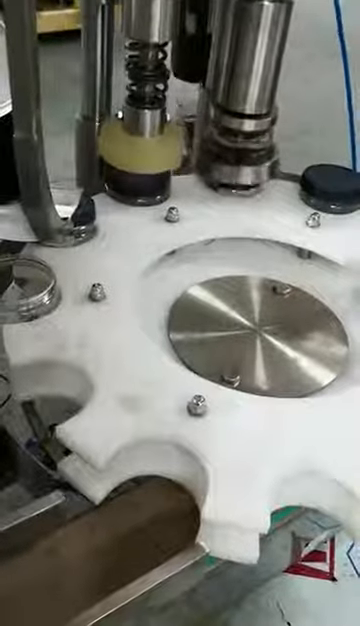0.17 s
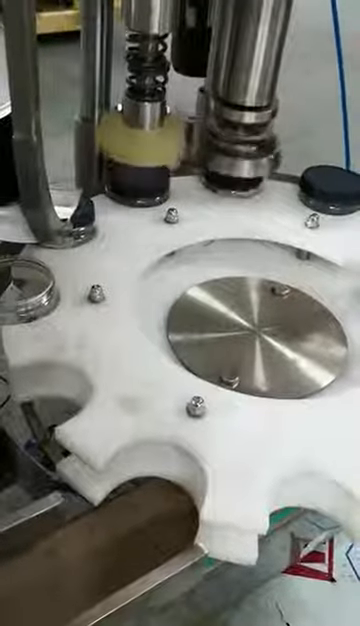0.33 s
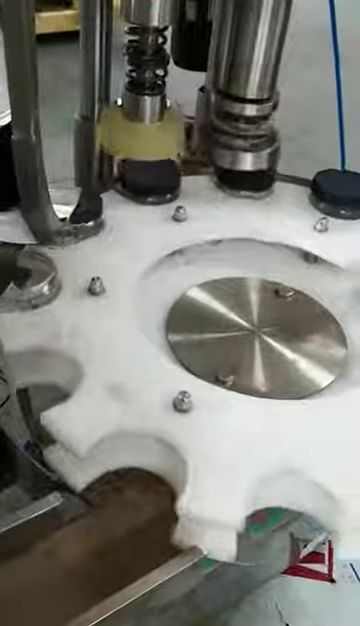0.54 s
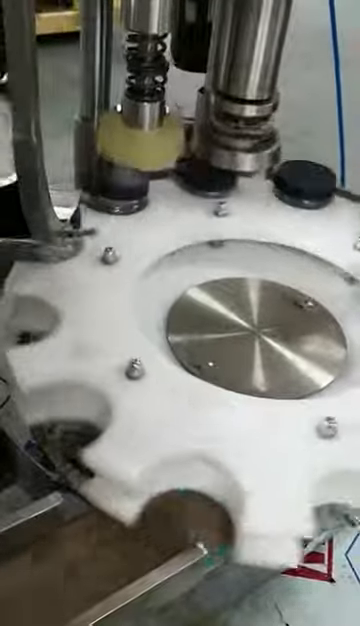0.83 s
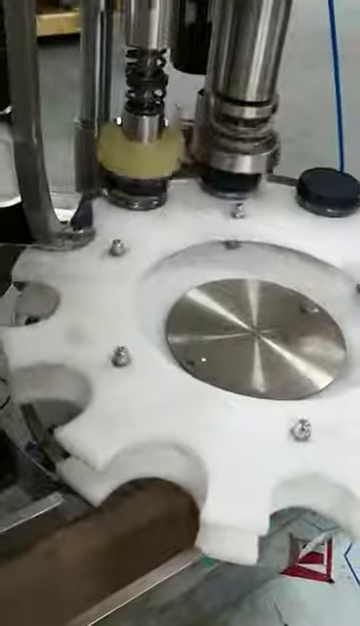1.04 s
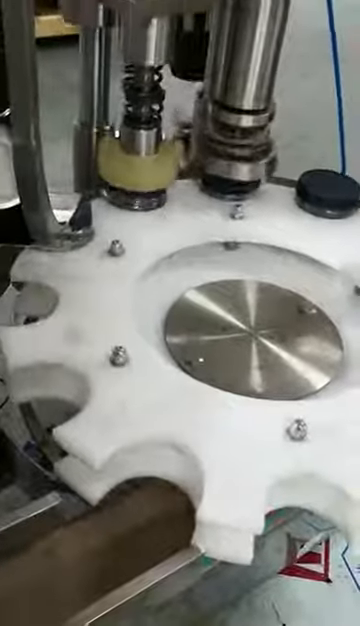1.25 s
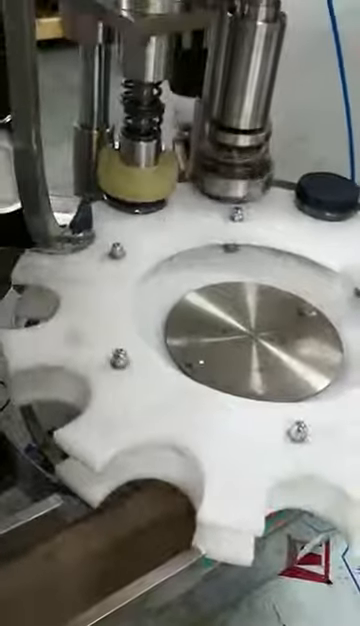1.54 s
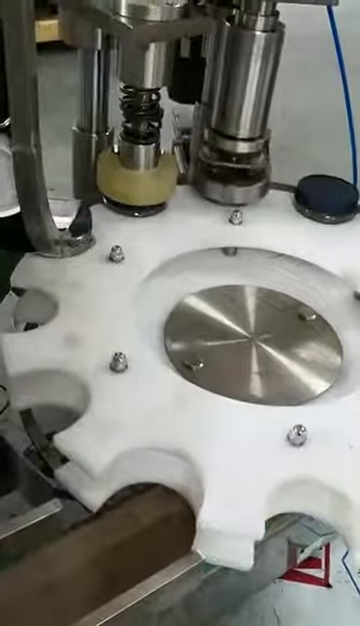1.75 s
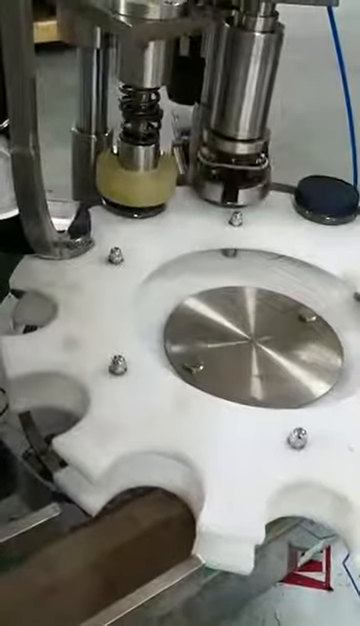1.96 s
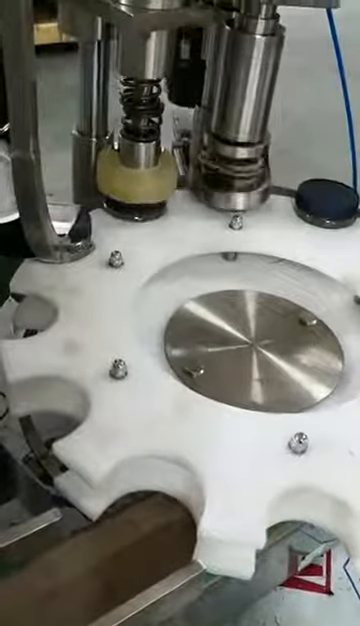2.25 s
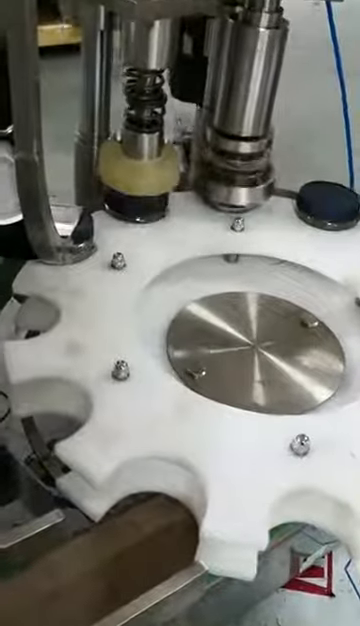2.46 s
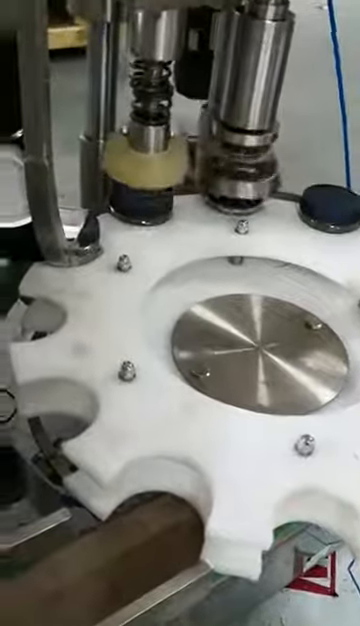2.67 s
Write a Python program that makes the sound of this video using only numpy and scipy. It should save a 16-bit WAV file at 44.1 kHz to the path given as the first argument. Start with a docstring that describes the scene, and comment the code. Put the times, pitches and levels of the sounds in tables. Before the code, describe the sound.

Close up in a workshop, a capping machine hums, rattles and hisses. A wheel drags clinking jars along, the heads land with taps and one sharp metal clack, a cap spins tight, and the heads lift with thumps.

```python
"""One cycle of a bottle capping machine, close by in a workshop. Motor rumble, drive hum, rattle and an
air leak run throughout. The frame thumps and a cap clinks; at 0.7 s the star wheel drags the jars on,
with clinks, squeaks and hissing valves. From 1.2 s the heads come down with thumps and taps, then one
hard clack and a puff of air. From 1.8 s the chuck spins a cap tight with a whirr and small squeaks;
after 2.2 s the heads lift, valves hiss and the frame thumps again."""
import sys
import numpy as np
from scipy import signal
from scipy.fft import rfft, irfft, next_fast_len
from scipy.io import wavfile
from scipy.ndimage import uniform_filter1d

SR = 44100
rng = np.random.default_rng(int(sys.argv[2]) if len(sys.argv) > 2 else 0)


def master_out(mix):
    """Clip the mix to full scale and print it as 16-bit PCM to the path in sys.argv[1]."""
    frames = np.transpose(np.atleast_2d(mix))
    ceiling = np.clip(frames, -1, 1)
    pcm = np.round(ceiling * 32767).astype(np.int16)
    wavfile.write(sys.argv[1], SR, pcm)


N = 123921
T = np.arange(N) / SR
EDGE_HZ, TOP_HZ = 7560, 8600  # upper band limits


def amp(db):
    """Amplitude ratio of a level in decibels."""
    return 10 ** (np.asarray(db) / 20)

def unit(x):
    """Normalisation to rms 1."""
    return x / np.sqrt(np.mean(x ** 2) + 1e-20)

def read(points, hz):
    """Interpolation on a logarithmic frequency axis."""
    f, value = np.transpose(points)
    return np.interp(np.log(hz + 1), np.log(f), value)

def contour(points, outside=None):
    """Linear interpolation in time."""
    return np.interp(T, *np.transpose(points), left=outside, right=outside)

def pan(db):
    """Constant-power panning: a positive level difference favours the left."""
    gains = amp(np.array([np.atleast_1d(db), -np.atleast_1d(db)]) / 2)
    return gains / np.sqrt((gains ** 2).mean(0))

def colour(x, spectrum, tilt_db=0):
    """Minimum-phase filtering at unit power, with a tilt per octave."""
    hz = abs(np.fft.fftfreq(4096, 1 / SR))
    tilt = tilt_db * np.log2(np.maximum(hz, 500) / 1000)
    rolloff = 60 * np.clip(hz / EDGE_HZ - 1, 0, 1)
    log_gain = np.log(unit(amp(read(spectrum, hz) + tilt - rolloff)))
    impulse = np.fft.ifft(np.exp(np.conj(signal.hilbert(log_gain)))).real[:2048]
    return signal.oaconvolve(x, impulse[None], axes=1)[:, :N]

def noise(correlation=0.):
    """Partially coherent white noise in two channels."""
    white = rng.standard_normal((3, N))
    return np.sqrt(correlation) * white[2] + np.sqrt(1 - correlation) * white[:2]

def drift(hz):
    """Low-pass random fluctuation of rms 1."""
    size = next_fast_len(N)
    spectrum = rfft(rng.standard_normal(size)) / (1 + (np.fft.rfftfreq(size, 1 / SR) / hz) ** 4)
    return unit(irfft(spectrum, size)[:N])

def sine(hz):
    """Frequency modulation: phase is the integral of frequency."""
    return np.sin(2 * np.pi * np.cumsum(hz) / SR)

def band(hz, width_hz):
    """A randomly driven resonance: narrow-band noise, independent in each channel."""
    phase = 2 * np.pi * hz * T
    return np.array([unit(drift(width_hz / 2) * np.cos(phase) + drift(width_hz / 2) * np.sin(phase))
                     for _ in range(2)])

def grains(per_s, spread_db):
    """Shot noise: tiny random impacts of uneven size."""
    impacts = (rng.random((2, N)) < per_s / SR) * rng.choice([-1, 1], (2, N))
    return unit(impacts * amp(spread_db * np.minimum(rng.exponential(1, (2, N)), 3)))

def ring(s, modes, scatter=0.):
    """Free decay of modes struck at time s, their phases scattered by up to `scatter` cycles."""
    t = T[T >= s][:SR] - s
    tone = sum(amp(db - 60 * t / t60) * np.sin(2 * np.pi * (hz * t + scatter * rng.random()))
               for hz, db, t60 in modes)
    return np.pad(tone, (np.sum(T < s), N))[:N]

def swells(rows):
    """Incoherent addition: the stereo envelopes of bursts sum in power."""
    power = sum((amp(db) * pan(pan_db)) ** 2 * np.exp(-((T - s) / np.where(T < s, rise, fall)) ** 2)
                for s, rise, fall, db, pan_db in rows)
    return np.sqrt(power)

def flutter(x, depth_db=2.2):
    """Random amplitude modulation, band by band."""
    bands = signal.stft(x, nperseg=512)[2]
    field = uniform_filter1d(rng.standard_normal(bands.shape[1:]), size=6, axis=0)
    field = unit(uniform_filter1d(field, size=8, axis=1))
    return signal.istft(bands * amp(depth_db * field), nperseg=512)[1][:, :N]

def from_left(x, delay_s=.00059):
    """Path difference: sound from the left arrives later on the right."""
    hz = np.fft.rfftfreq(N, 1 / SR)
    return np.array([x[0], irfft(rfft(x[1]) * np.exp(-2j * np.pi * hz * delay_s), N)])


# Motor rumble spectrum: f/Hz, level/dB
RUMBLE_SPECTRUM = [(20,-10.5),(45,-7.5),(90,-3),(150,-2),(200,2),(250,-1.5),(330,-2),(420,-7),(520,-30.5),(1000,-28.5)]
# Rumble envelope: t/s, level/dB
RUMBLE_LEVEL = [(0,0),(.78,-2),(.85,-8.5),(1.05,-2),(1.25,-1),(1.5,0),(1.62,-1.5),(1.9,-0.5),(2.32,1.5),(2.45,-2),(2.81,-2)]
def motor_rumble():
    """Random vibration of the motor radiates low noise, almost coherent between the channels."""
    gain = amp(-38 + contour(RUMBLE_LEVEL) + drift(18))
    return gain * pan(-0.5) * colour(noise(0.99), RUMBLE_SPECTRUM)

# Course of the drive's tone: t/s, f/Hz, level/dB
HUM_COURSE = [(0,202.7,-46),(0.251,203,-38),(0.499,187.5,-47.5),(0.761,189.1,-39.5),(.86,195,-70),(1.3,204,-37.5),(1.599,200,-51.5),(1.769,185,-36),(1.88,203.3,-46),(2.151,202.8,-33),(2.359,199.4,-48.5),(2.551,201.4,-36.5),(2.68,186.5,-51),(2.81,186,-36.5)]
def drive_hum():
    """Periodic vibration of the drive gives one tone, wavering in amplitude and frequency."""
    s, hz, db = np.transpose(HUM_COURSE)
    gain = amp(np.interp(T, s, db) + 3 * drift(41))
    return gain * np.sqrt(2) * sine(np.interp(T, s, hz) + 5 * drift(17))

# Rattle spectrum: f/Hz, level/dB
RATTLE_SPECTRUM = [(150,-29.5),(400,0.5),(540,-6.5),(720,-2),(1000,-3),(1500,-2.5),(2250,1),(2800,-2),(3300,-6.5),(3750,-7.5),(4300,-12),(5300,-6.5),(6300,-13),(7500,-16.5)]
# Activity of the mechanism: t/s, level/dB
RATTLE_LEVEL = [(0,3),(.1,0),(.25,-0.5),(.42,1),(.5,4.5),(.58,3.5),(.66,0),(.92,4),(1.1,1),(1.35,3),(1.55,3),(1.78,3.5),(2.12,3),(2.34,0.5),(2.44,2),(2.8,-1.5)]
def rattle():
    """Many small impacts in the mechanism superpose into broadband noise."""
    gain = amp(-35.5 + contour(RATTLE_LEVEL) + 0.21 * drift(13))
    impacts = 0.93 * noise(0.2) + 0.55 * grains(220, 1.64)
    return from_left(flutter(gain * colour(impacts, RATTLE_SPECTRUM)))

# Leak spectrum: f/Hz, level/dB
LEAK_SPECTRUM = [(2500,-35),(4200,-9),(4900,-12),(5300,-5.5),(5900,0.5),(6500,-6),(7100,1.5),(7400,4.5),(7600,-6)]
def air_leak():
    """A turbulent jet from the air line hisses steadily on the right."""
    gain = amp(-36.5 + 0.28 * drift(33))
    return flutter(gain * pan(-39.5) * colour(noise(), LEAK_SPECTRUM))

# Starts and stops of strokes: t/s, level/dB, duration/s, relative shudder/dB
THUMPS = [(0.076,-21.5,0.13,-12),(1.2218,-18.5,0.02,-4),(1.256,-27.5,0.026,-12.5),(1.292,-32,0.014,-10),(1.395,-32.5,0.033,-1.5),(2.2142,-15.5,0.027,-22.5),(2.252,-24,0.063,-12),(2.443,-21.5,0.115,-6.5)]
# Upper frame modes: f/Hz, level/dB, T60/s
FRAME_MODES = [(291.7,-6,0.16),(371.6,-16,0.27)]
# Shudder spectrum: f/Hz, level/dB
SHUDDER_SPECTRUM = [(150,-28),(220,-3.5),(320,-1),(410,-4),(520,-16.5),(900,-32)]
def frame_thumps(boom_hz=201.4, sag_hz=89, sag_s=0.0068, rise_s=0.0032, boom_t60=0.36, shudder_t60=0.3):
    """Transient excitation: the frame shudders, and booms with sagging pitch until the load damps it."""
    tones, shudder = np.zeros(N), np.zeros(N)
    for s, db, duration, shudder_db in THUMPS:
        t = np.maximum(T - s, 0)
        attack = amp(db) * (1 - np.exp(-(t / rise_s) ** 2))
        boom = sine((t > 0) * (boom_hz + sag_hz * np.exp(-t / sag_s))) * amp(-60 * t / boom_t60)
        damping = np.exp(-(t / duration) ** 4)
        tones += attack * damping * (boom + ring(s, FRAME_MODES))
        shudder += attack * amp(shudder_db - 60 * t / shudder_t60)
    return tones + shudder * colour(noise(0.31), SHUDDER_SPECTRUM)

# Bumps of caps and jars: t/s, level/dB, f/Hz, pan/dB
CLINKS = [(.0925,-25,2330,-11.5),(.7223,-25,2730,-2),(.7637,-12,2350,11),(.7812,-17.5,2860,18),(.8142,-14,1850,6.5),(.8246,-20.5,2220,16),(1.6926,-22.5,2287,8),(1.7016,-14.5,2300,20.5),(2.1994,-24,2410,12)]
# Modes of a plastic cap, also struck in head_taps: f/Hz, level/dB, T60/s
CAP_MODES = [(1800,-7.5,0.01),(1984,-6.5,0.044),(2250,-1.5,0.02),(2566,-7.5,0.022),(3930,-13,0.02)]
def clinks(t60=0.033, rise_s=.0007):
    """Free vibration after a bump on the rail or chuck: one brief note over the cap's modes."""
    out = np.zeros((2, N))
    for s, db, hz, pan_db in CLINKS:
        t = np.maximum(T - s, 0)
        note = pan(pan_db) * ring(s, [(hz, 0, t60)])
        cap = amp(-9) * np.array([ring(s, CAP_MODES, 1), ring(s, CAP_MODES, 0.96)])
        out += amp(db) * (1 - np.exp(-(t / rise_s) ** 2)) * (note + cap)
    return out

# Scrapes of the heads: peak t/s, rise/s, fall/s, level/dB, pan/dB
SCRAPES = [(.585,0.015,0.0091,-36,-6),(1.428,0.0068,0.0057,-11,1.5),(1.697,0.021,0.015,-26,1),(1.845,0.009,0.0061,-38,3),(2.207,0.019,0.032,-28,3)]
# Scrape spectrum: f/Hz, level/dB
SCRAPE_SPECTRUM = [(200,-7.5),(800,-10),(1300,-1),(1800,-5.5),(2500,-1.5),(3100,-3.5),(3700,-8),(5000,-10.5),(5900,-4),(6500,-6.5),(7500,-13.5)]
def head_scrapes():
    """Sliding friction of the heads in their guides makes short bursts of gritty noise."""
    return swells(SCRAPES) * colour(unit(noise() + 1.2 * grains(1800, 20.0)), SCRAPE_SPECTRUM)

# Envelope of jars moving with the star wheel: t/s, level/dB
SLIDE_LEVEL = [(.705,-43),(.735,-25.5),(.755,-33.5),(.775,-24),(.785,-22.5),(.81,-23),(.824,-17.5),(.831,-23),(.885,-34.5),(.93,-62)]
# Friction spectrum: f/Hz, level/dB
SLIDE_SPECTRUM = [(250,-32),(650,-3.5),(1100,-18),(1350,-2),(1750,-5.5),(2000,4),(2350,-2.5),(2900,-0.5),(3400,-9),(3750,-7.5),(4100,-46),(7500,-10)]
# Guide rail resonances: f/Hz, bandwidth/Hz, level/dB, pan/dB
RAIL_RESONANCES = [(1699,130,-5,-1.5),(2432,780,-4,0.5),(2840,200,-7,-5),(3660,120,-16.5,-10)]
def sliding_jars():
    """Forced vibration: chattering jars drive the resonances of the guide rail."""
    rail = sum(amp(db) * pan(pan_db) * band(hz, width) for hz, width, db, pan_db in RAIL_RESONANCES)
    chatter = amp(contour(SLIDE_LEVEL, outside=-120) + 2.04 * drift(120))
    friction = colour(unit(noise() + 1.4 * grains(880, 5.9)), SLIDE_SPECTRUM)
    return chatter * (rail + 1.04 * pan(-0.42) * friction)

# Exhaust bursts: peak t/s, rise/s, fall/s, level/dB, pan/dB
EXHAUSTS = [(.737,0.011,0.0074,-28,-11),(.812,0.026,0.028,-20,-11),(1.19,0.057,0.03,-31.5,-12),(1.695,0.026,0.015,-32,-11),(1.82,0.036,0.018,-31,-31.5),(2.205,0.01,0.028,-29.5,-21),(2.285,0.029,0.033,-30,-3)]
# Exhaust spectrum: f/Hz, level/dB
EXHAUST_SPECTRUM = [(1000,-23),(3000,-15.5),(4400,-6),(5200,-6),(5800,0),(6500,1),(7400,6)]
def valves():
    """Turbulence in the exhaust air radiates soft bursts of hiss."""
    return swells(EXHAUSTS) * colour(noise(0.044), EXHAUST_SPECTRUM)

# Slips of jars and caps: t/s, f/Hz, level/dB
SQUEAKS = [(0.787,3730,-26.5),(.799,3758,-23.5),(1.908,5350,-25.5),(1.949,5350,-31.5),(2.02,5247,-37.5),(2.042,5020,-29.5),(2.084,5230,-33.5),(2.178,4950,-29)]
def squeaks(rise_s=0.0043, bend_hz=260, jitter_hz=107.6):
    """Stick-slip of plastic on the rail and in the chuck gives high, falling chirps."""
    out = np.zeros(N)
    for s, hz, db in SQUEAKS:
        age = np.maximum(T - s, 0) / rise_s
        pitch = hz + bend_hz * (np.exp(-age / 2) - .5) + jitter_hz * drift(400)
        out += amp(db) * age * np.exp(1 - age) * np.sqrt(2) * sine(pitch)
    return out * pan(-19)

# Landings of the heads: t/s, level/dB, jar f/Hz, relative cap level/dB
TAPS = [(1.2135,-19,803,1.5),(1.3078,-18,681,-2.5),(1.7005,-24,714.7,4.5)]
# Impact noise spectrum, shared with metal_knocks: f/Hz, level/dB
IMPACT_SPECTRUM = [(120,-22),(500,-21),(950,-12),(1500,8),(1900,3),(2300,8),(2900,-2.5),(3700,-1.5),(4500,1),(5200,2),(5750,-38),(6300,-5.5),(6900,1),(7500,1.5)]
def head_taps(rise_s=0.0015, t60=0.038):
    """Cushioned impact: a head lands on a cap, exciting its modes and the jar's hollow note."""
    out = np.zeros((2, N))
    for s, db, hz, cap_db in TAPS:
        t = np.maximum(T - s, 0)
        grit = amp(-6.5 - 60 * t / t60) * colour(noise(), IMPACT_SPECTRUM, tilt_db=-4.5)
        jar = pan(-6.5) * ring(s, [(hz, 0, t60), (1.3 * hz, -8, t60)])
        cap = amp(cap_db) * pan(10) * np.array([ring(s, CAP_MODES, 0.93), ring(s, CAP_MODES, 0.91)])
        out += 2 * amp(db) * (1 - np.exp(-(t / rise_s) ** 2)) * (jar + cap + grit)
    return out

# Blows within the clack: t/s, level/dB, pan/dB, tilt/(dB per octave), click level/dB
KNOCKS = [(1.3855,4,-1.5,.5,0),(1.3897,-9,-2,-3,0),(1.3947,-2,-1,1,-8),(1.3977,-7.5,-2,3,-12),(1.403,-13,0,-1,-3),(1.4095,-12,1,-2,-3),(1.4244,-6.5,-2,2,-20),(1.4274,-13,1,2,-20)]
# Modes of the steel head: f/Hz, level/dB, T60/s
STEEL_MODES = [(1255,0,.6),(1334,-3,.3),(1698,-4,.7),(2202,0,.35),(2380,-2,.4),(2672,0,.6),(2820,-3,.6),(3082,-5,.5),(3340,-1,.6),(3677,-6,.6),(4026,-7,.6),(4991,-4,.55),(5410,-7,.5),(5795,-6,.5)]
# Direction of the blows by frequency: f/Hz, pan/dB
KNOCK_PAN = [(500,-16.5),(1200,-8.5),(2200,22.5),(3000,-19),(4500,-2),(7000,-18.5)]
def metal_knocks(rise_s=0.0005, crack_t60=0.021, snap_s=.0009, click_hz=1020, click_t60=.012):
    """Brief, hard contact excites a wide band: a snap, a click, a crack and a faint ring of steel."""
    out = np.zeros((2, N))
    for s, db, pan_db, tilt_db, click_db in KNOCKS:
        t = np.maximum(T - s, 0)
        burst = noise(0.6) * np.minimum(t / rise_s, 1) * amp(-60 * t / crack_t60)
        crack = colour(burst, IMPACT_SPECTRUM, tilt_db)
        snap = amp(3) * noise(0.68) * (t > 0) * np.exp(-t / snap_s)
        click = ring(s, [(click_hz, 3 + click_db, click_t60)])
        steel = amp(-27) * np.array([ring(s, STEEL_MODES, 0.97), ring(s, STEEL_MODES, 1)])
        out += amp(db - 12) * pan(pan_db) * (snap + click + crack + steel)
    return irfft(rfft(out) * pan(read(KNOCK_PAN, np.fft.rfftfreq(N, 1 / SR))), N)

def air_puff(peak_s=1.429, width_s=0.0019):
    """Air displaced as the head seats arrives as a single pressure pulse."""
    return -amp(-14.5) * np.exp(-((T - peak_s) / width_s) ** 2 / 2)

# Envelope of the chuck's spin: t/s, level/dB
CHUCK_LEVEL = [(1.81,-60),(1.84,-42.5),(1.93,-45),(1.98,-40),(2.06,-44.5),(2.11,-40.5),(2.17,-45),(2.22,-45.5),(2.25,-58)]
# Housing resonances: f/Hz, bandwidth/Hz, level/dB
HOUSING_RESONANCES = [(843,150,2.5),(347,26,-1),(373,13,-5),(1210,690,1)]
def chuck(note_hz=833, wobble_hz=32.5, flutter_db=4.5):
    """Friction on the cap makes the spinning chuck sing unsteadily over its resonating housing."""
    note = np.sqrt(2) * sine(note_hz + wobble_hz * drift(70)) * amp(flutter_db * drift(70))
    whirr = sum(amp(db) * band(hz, width) for hz, width, db in HOUSING_RESONANCES)
    return amp(contour(CHUCK_LEVEL, outside=-120)) * (note + whirr)

# Reverberation time of the workshop: f/Hz, T60/s
ROOM_T60 = [(200,0.15),(1000,0.4),(3000,0.99),(7000,0.37)]
def reverberation(x, build_s=0.009):
    """A diffuse field builds up, then decays exponentially, each band at its own rate."""
    hz, t, bands = signal.stft(rng.standard_normal((2, SR)), SR, nperseg=256)
    tail = signal.istft(bands * amp(-60 * t / read(ROOM_T60, hz)[:, None]), SR, nperseg=256)[1]
    tail *= np.minimum(np.arange(tail.shape[1]) / SR / build_s, 1)
    return signal.fftconvolve(x, tail / np.linalg.norm(tail[0]), axes=1)[:, :N]

def scene():
    """Superposition of the working parts, their reverberation and the running machine."""
    parts = sliding_jars() + head_scrapes() + valves() + head_taps() + clinks()
    parts += metal_knocks() + squeaks() + chuck()
    cycle = parts + amp(-12) * reverberation(parts) + frame_thumps() + air_puff()
    return cycle + drive_hum() + motor_rumble() + rattle() + air_leak()

def lowpass(x, edge_hz):
    """Steep linear-phase band limit."""
    return signal.oaconvolve(x, signal.firwin(1023, edge_hz, window=("kaiser", 9), fs=SR)[None], "same")

def record(dry, ceiling=.85):
    """Soft saturation rounds the peaks between two band limits."""
    narrow = lowpass(dry, EDGE_HZ)
    rounded = narrow / (1 + abs(narrow / ceiling) ** 6) ** (1 / 6)
    return lowpass(rounded, TOP_HZ)


dry = scene()
out = record(dry)
master_out(out)
```